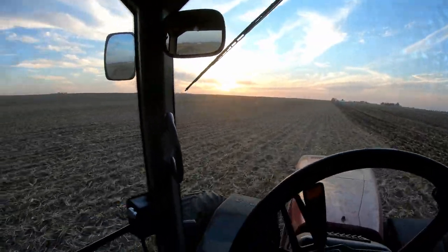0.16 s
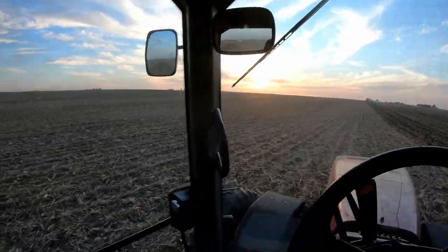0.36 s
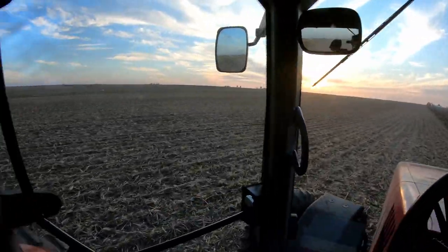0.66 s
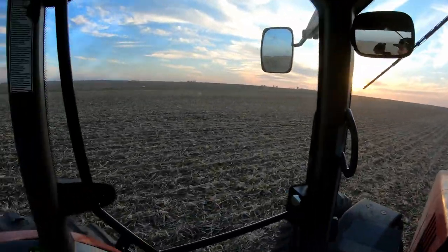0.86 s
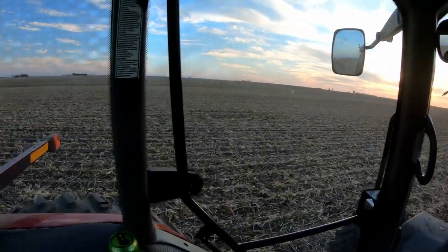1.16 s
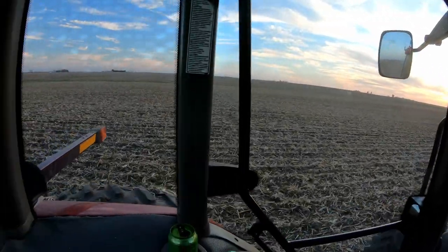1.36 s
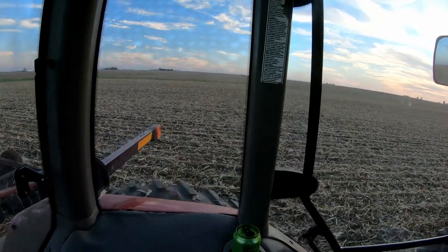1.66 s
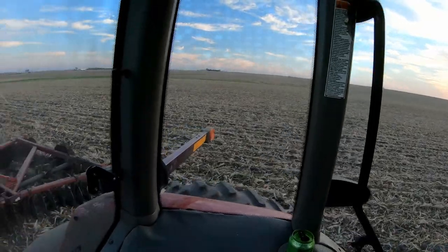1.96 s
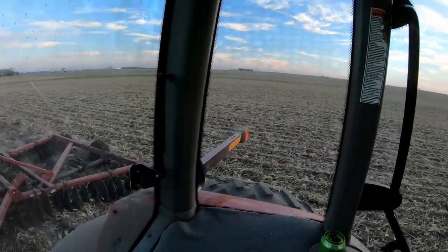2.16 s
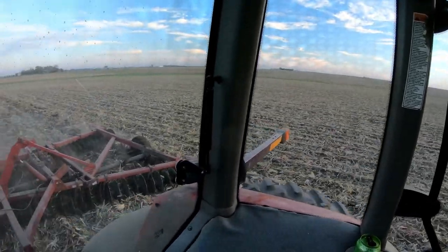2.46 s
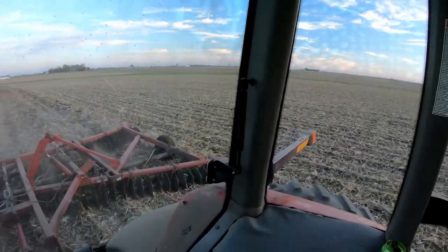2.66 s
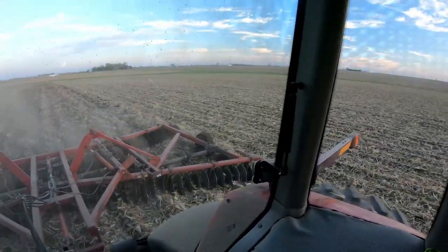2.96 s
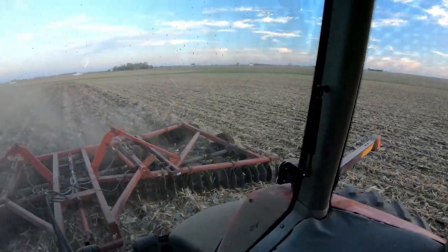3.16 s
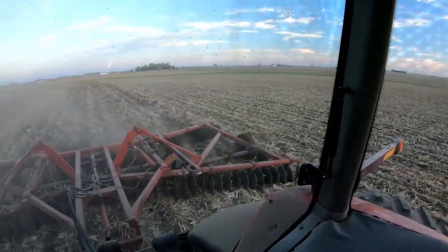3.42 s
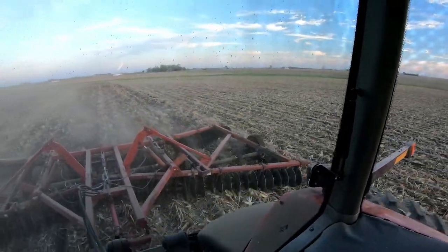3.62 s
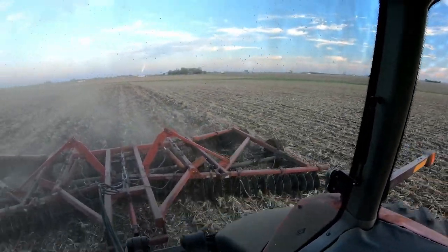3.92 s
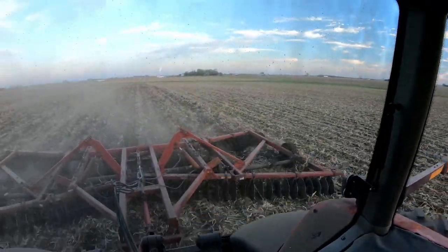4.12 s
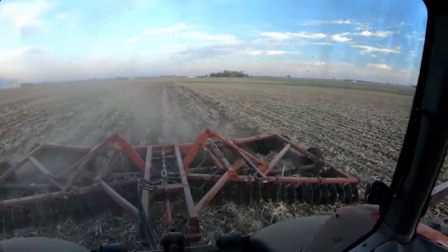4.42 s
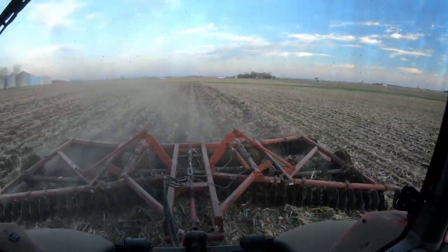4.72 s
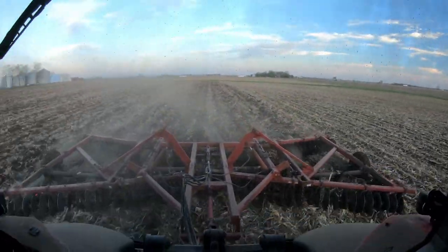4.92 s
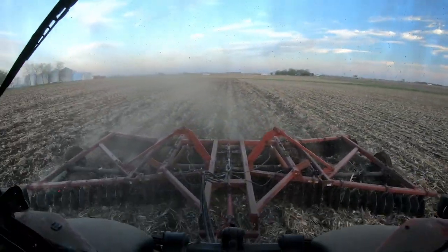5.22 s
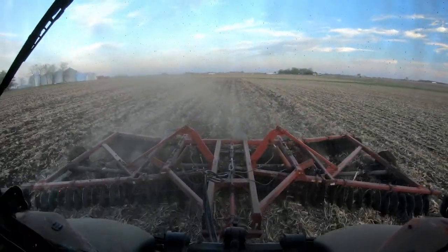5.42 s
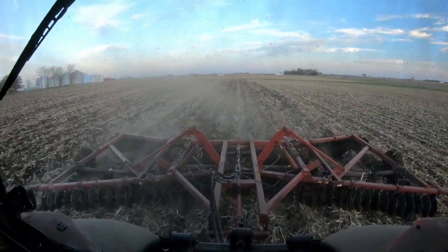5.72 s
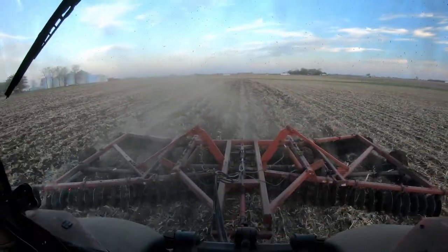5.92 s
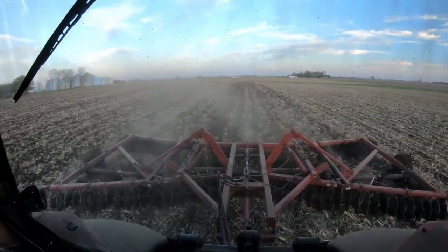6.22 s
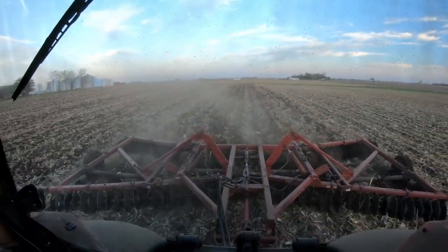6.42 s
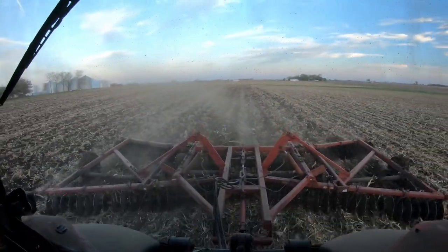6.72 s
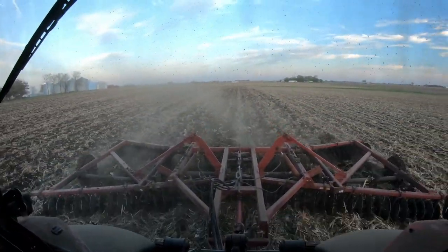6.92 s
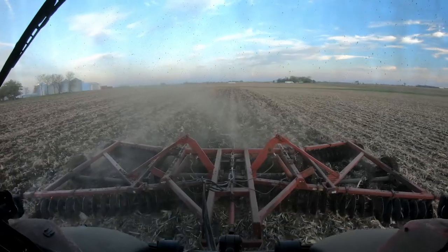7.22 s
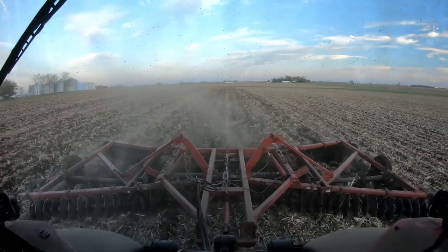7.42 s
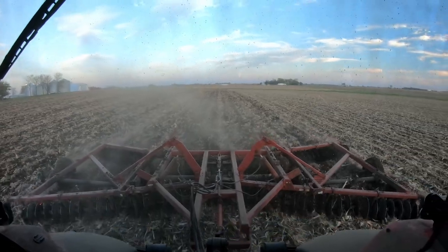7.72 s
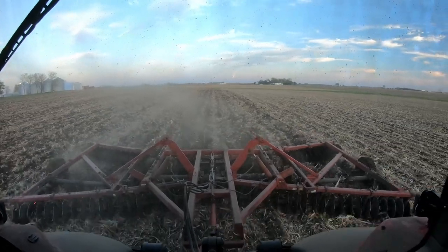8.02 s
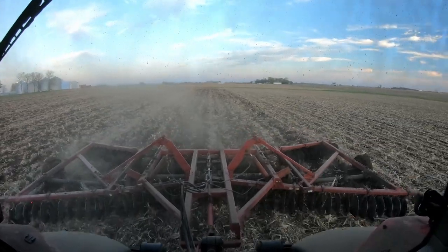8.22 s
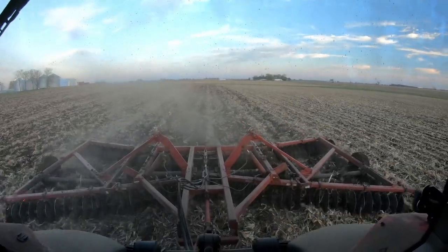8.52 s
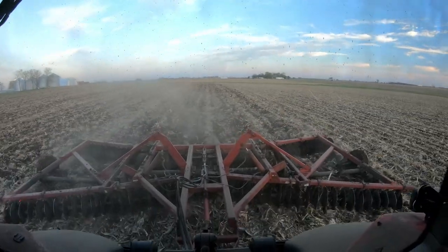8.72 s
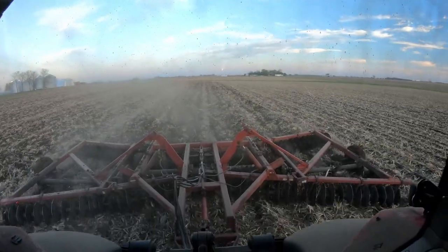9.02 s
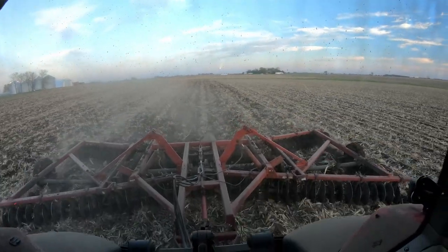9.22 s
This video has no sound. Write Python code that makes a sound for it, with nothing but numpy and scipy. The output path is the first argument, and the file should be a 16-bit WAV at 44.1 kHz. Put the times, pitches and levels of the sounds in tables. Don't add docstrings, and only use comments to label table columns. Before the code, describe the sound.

Inside the closed cab of a diesel tractor pulling a disc harrow across a dry field, mono, dry and close. At 0 s the engine drones at a constant low pitch, around 84 Hz, with grainy clatter and thin gear whine from the bonnet side. From 0.3 to 1.5 s the low boom swells strongly as the listener turns, its octave overtone growing until 2 s, then easing and returning slightly after 6.5 s. The full boom holds to the end at 9.4 s. Deep uneven ground rumble and wall drumming continue throughout, with panels ringing and a faint high turbo whine. A hard short rattling knock falls at 0.65 s, a firm one at 1.6, light ones at 2.8, 3.7 and 4.9, a medium one at 6.5. Fine grit hisses softly on glass, with tiny ticks mostly between 1 and 4 s, and later at 5.9 and 8 s.

```python
import sys
import numpy as np
from scipy import signal
from scipy.fft import rfft, irfft, next_fast_len
from scipy.io import wavfile

SR = 44100
rng = np.random.default_rng(int(sys.argv[2]) if len(sys.argv) > 2 else 0)


def digitize_waveform(pressure):
    field = np.atleast_2d(pressure).T
    bounded = np.clip(field, -1, 1)
    quanta = np.round(bounded * 32767).astype(np.int16)
    wavfile.write(sys.argv[1], SR, quanta)


def natural_amplitude(level_db):
    exponent = np.asarray(level_db, float) / 20
    return 10 ** exponent


N = 413216


def engine():
    # t/s, boom level/dB, second harmonic level/dB
    firing = [(0.0, -25, -33), (0.35, -23, -32), (0.7, -20.5, -38), (1.05, -16.5, -38), (1.45, -13.5, -27),
              (1.95, -13.5, -23.5), (3.2, -13.3, -25.5), (4.4, -13.5, -30), (5.6, -13.5, -34),
              (6.4, -13.5, -32), (7.5, -13, -29), (9.37, -13, -28.5)]
    # order [sixths of the firing rate], level/dB rms
    uneven = [(8, -39), (9, -44), (10, -44.5), (14, -47.5), (20, -53), (22, -56), (24, -50.5)]
    # f/Hz, level/dB rms
    shafts = [(28, -43), (35, -39), (51.5, -52)]
    firing_hz = 84.05
    octave_lag = 0.8
    boom_db, octave_db = in_time(firing)
    third_db = heard(back_db=-52.5, front_db=3, side_db=-3.5, part="third")

    phase = 2 * np.pi * np.cumsum(firing_hz + 0.087 * drift(1.3)) / SR
    note = natural_amplitude(boom_db + 0.12 * drift(5.6)) * np.cos(phase)
    note += natural_amplitude(octave_db + 0.7 * drift(3.8)) * np.cos(2 * phase - octave_lag)
    note += natural_amplitude(third_db + 2.5 * drift(1.5)) * np.cos(3 * phase)
    for sixths, db in uneven:
        start = 2 * np.pi * rng.random()
        note += natural_amplitude(db + 2.5 * drift(2)) * np.cos(phase * round(sixths) / 6 + start)
    driveline = sum(natural_amplitude(db) * tone(hz, wobble_hz=0.22, flutter_db=2.5) for hz, db in shafts)
    return np.sqrt(2) * note + driveline


def cab():
    # f/Hz, level/dB per Hz
    rumble_colour = [(2, -14), (5, 0), (9, -7), (15, -3), (24, -10), (36, -16), (45, -25), (60, -29),
                     (72, -24), (80, -30)]
    # f/Hz, level/dB per Hz
    drum_colour = [(66, -37), (76, -17), (84, -19), (92, 2), (102, 1.5), (115, 0.5), (132, -15.5),
                   (155, -7.5), (185, -13.5), (230, -20), (300, -27)]
    # f/Hz, level/dB per Hz
    block_colour = [(120, -32.5), (200, -1.5), (293, -8), (338, -5.5), (361, -7), (480, -4), (520, -9),
                    (660, -10), (908, -14), (1170, -13.5), (1230, -15), (1440, -18), (2560, -20),
                    (4540, -33.5), (9000, -42.5), (11700, -74), (19800, -120)]
    # t/s, level/dB
    ground = [(0, -35), (1.1, -33.5), (1.7, -39), (2.5, -31.5), (3.9, -28.5), (4.6, -32.5), (4.9, -27),
              (7.2, -28.5), (8.1, -31.5), (8.8, -28), (9.07, -32), (9.3, -21.5)]
    white = rng.standard_normal((4, N))

    rumble_db = heard(back_db=-33, front_db=3, side_db=2.5) + 5.0 + 1.5 * drift(1.5)
    rumble = natural_amplitude(rumble_db) * coloured(white[0], rumble_colour)

    drum_db = in_time(ground)[0] + 0.39 * drift(6.1)
    drumming = natural_amplitude(drum_db) * coloured(white[1], drum_colour)

    strokes = white[2] * natural_amplitude(0.21 * drift(4.8) + 0.6 * drift(30))
    block_db = heard(back_db=-42.5, front_db=2, side_db=0.65) + 3.5
    clatter = natural_amplitude(block_db) * coloured(strokes, block_colour)
    return rumble + drumming + clatter + ringing(white[3])


def ringing(white):
    # name, f/Hz, width/Hz, level/dB facing back, extra/dB front, extra/dB side
    panels = [("wall", 297, 62, -43.5, -7, 2), ("window", 480, 34, -46, 0.1, 0.1),
              ("trim", 422, 16, -55, 8.4, 5.6), ("bonnet", 1430, 110, -55.5, 7, 0.1),
              ("hood side", 2480, 140, -59.5, 6.9, 1.7)]
    # f/Hz, width/Hz, level/dB rms
    covers = [(672, 9, -59), (1680, 30, -66), (2625, 12, -70), (3350, 300, -64)]
    out = np.zeros(N)
    for name, hz, width_hz, *facing_db in panels:
        out += natural_amplitude(heard(*facing_db, part=name)) * narrow(white, hz, width_hz)
    for hz, width_hz, db in covers:
        out += natural_amplitude(db + 3.4 * drift(1.3)) * narrow(white, hz, width_hz)
    return out


def gears():
    # name, f/Hz, level/dB facing back, extra/dB front, extra/dB side
    whines = [("mesh 1", 1056, -55.5, 1.3, 0.1), ("mesh 2", 1147, -57.5, 2.6, 3),
              ("mesh 3", 1316, -67, 10, 9.4), ("mesh 4", 2107, -67, 6, 3), ("pump", 1862, -65.5, 3, 0.1),
              ("blower", 4255, -82.5, 6, 1.5), ("idler", 1685, -71, 7, 6), ("window", 487, -47.5, 0.1, 0.1),
              ("cover", 672, -56.5, -7, -5.5)]
    # t/s, f/Hz
    turbo = [(0, 8430), (1.3, 8320), (2.0, 8380), (3.5, 8430), (4.6, 8350), (6.5, 8300), (7.5, 8370),
             (8.6, 8580), (9.37, 8680)]
    out = np.zeros(N)
    for name, hz, *facing_db in whines:
        out += natural_amplitude(heard(*facing_db, part=name)) * tone(hz, wobble_hz=hz * 0.002, flutter_db=2.5)
    blade_hz = in_time(turbo)[0]
    blade_db = heard(back_db=-82.5, front_db=6.6, side_db=3, part="turbo")
    return out + natural_amplitude(blade_db) * tone(blade_hz, wobble_hz=14, flutter_db=3.5)


def knocks():
    # t/s, peak level/dB, ringing f/Hz, dull f/Hz, dull level/dB
    strikes = [
        (.6508, -22, 2400, 1700, 0.5),
        (1.5725, -27.5, 2700, 1550, 0.5),
        (2.7794, -39, 2100, 1430, -4),
        (3.7174, -43, 3050, 1670, -8),
        (4.8583, -39, 2400, 1450, 1.5),
        (6.5140, -30.5, 2950, 1750, -2),
    ]
    edge_db, decay_s, rise_s = -19.5, 0.011, 0.0012
    length = 4000
    out, t = np.zeros(N), np.arange(length) / SR
    bursts = rng.standard_normal((len(strikes), length))
    for (s, db, hz, dull_hz, dull_db), burst in zip(strikes, bursts):
        rattle = np.sign(burst) * np.exp(-t / decay_s) * (1 - np.exp(-t / rise_s))
        body = narrow(rattle, hz, 600)
        body += natural_amplitude(dull_db) * narrow(rattle, dull_hz, 900)
        body += natural_amplitude(dull_db - 4) * narrow(rattle, 950, 500)
        body += natural_amplitude(edge_db) * narrow(rattle, 6000, 4000)
        out[round(s * SR):][:length] += natural_amplitude(db + 3) * body / np.abs(body).max()
    return out


def grit():
    # f/Hz, level/dB per Hz
    grit_colour = [(3500, -17), (6000, 0.5), (7300, -5), (8600, 1.5), (12200, 1), (14000, -4.5),
                   (15500, -6.5), (17000, -8.5)]
    # t/s, peak level/dB
    ticks = [(1.0824, -40.5), (2.0697, -40), (2.257, -39), (2.4433, -37), (2.7394, -43), (2.9612, -44),
             (3.3894, -46), (3.6282, -53), (4.21, -49), (5.8556, -43), (7.9794, -38.5)]
    gusts_db = 0.7 * drift(12) + 0.8 * drift(40)
    grains = rng.standard_normal(N) * natural_amplitude(1.5 * rng.exponential(1, N) + gusts_db)
    hiss_db = heard(back_db=-63, front_db=-5.5, side_db=-1, part="grit") + 1.5 + 0.6 * drift(1.5)

    length = 880
    decay = np.exp(-np.arange(length) / SR / 0.003)
    stones = np.zeros(N)
    for (s, db), burst in zip(ticks, rng.standard_normal((len(ticks), length))):
        stones[round(s * SR):][:length] += natural_amplitude(db - 6.0) * burst * decay
    glass = signal.butter(3, [8000, 13500], "band", fs=SR, output="sos")
    return natural_amplitude(hiss_db) * coloured(grains, grit_colour) + signal.sosfilt(glass, stones)


def heard(back_db, front_db, side_db, part=""):
    # t/s, angle/degrees
    facing = [
        (0, 0),
        (0.6, 19),
        (1.5, 64.5),
        (2.5, 98),
        (3.7, 135.5),
        (4.75, 179.5),
        (9.37, 179.5),
    ]
    # part, middle t/s, length/s, level/dB
    swells = [("window", 0.02, 0.44, 5.5), ("window", 0.9, 0.73, 4.5), ("window", 1.86, 0.78, 3.4),
              ("window", 3.1, 1.8, -7), ("window", 4.43, 0.71, 5.1), ("window", 4.5, 0.27, -12),
              ("window", 5.4, 0.54, 2.6), ("window", 6.75, .7, 3), ("window", 8.25, 0.65, 2.8),
              ("window", 8.75, 0.27, 5.5), ("trim", 2.22, 0.45, 8.3), ("trim", 8.9, .5, 12),
              ("wall", 1.18, 0.57, 6.7), ("turbo", 7.4, 3.5, 4), ("wall", 3.6, 0.71, 3),
              ("wall", 8.6, .8, 3.6), ("bonnet", 1.75, 0.65, 4.5), ("bonnet", 5.7, 3.5, 5.3),
              ("bonnet", 8.4, 0.54, 5), ("mesh 1", 0.39, 0.35, 5), ("grit", 2.96, 3.5, 3.2),
              ("mesh 1", 2.45, 1, -8), ("third", 0.15, .9, 8), ("mesh 2", 3.2, 1.5, 7),
              ("mesh 2", 7.35, 1.3, 5.5), ("hood side", 0.77, 0.59, 5), ("mesh 3", 2.2, 1.3, 6.7),
              ("mesh 4", 8.66, 1.6, 10.6), ("blower", 5.7, 2.6, 11), ("pump", 7.8, 3.5, 7)]
    t = np.arange(0, N + 64, 64) / SR
    angle = np.radians(np.interp(t, *np.transpose(facing)))
    db = back_db + front_db * np.maximum(np.cos(angle), 0) ** 2 + side_db * np.sin(angle) ** 2
    for name, s, length, swell_db in swells:
        if name == part:
            db += swell_db * np.cos(np.pi * np.clip((t - s) / length, -0.5, 0.5)) ** 2
    return np.interp(np.arange(N) / SR, t, db)


def tone(hz, wobble_hz, flutter_db):
    phase = 2 * np.pi * (np.cumsum(hz + wobble_hz * drift(2.97)) / SR + rng.random())
    return np.sqrt(2) * np.sin(phase) * natural_amplitude(flutter_db * drift(6.1))


def narrow(white, hz, width_hz):
    once = resonance(white, hz, width_hz)
    return rms_one(resonance(once, hz, width_hz))


def resonance(x, hz, width_hz):
    r = np.exp(-np.pi * width_hz / SR)
    poles = [1, -2 * r * np.cos(2 * np.pi * hz / SR), r * r]
    return signal.lfilter([(1 - r * r) / 2, 0, (r * r - 1) / 2], poles, x)


def coloured(x, spectrum):
    size = next_fast_len(N)
    hz = np.arange(1, size // 2 + 2) * SR / size
    points_hz, points_db = np.transpose(spectrum)
    gain = natural_amplitude(np.interp(np.log(hz), np.log(points_hz), points_db, left=-90, right=-90))
    return rms_one(irfft(rfft(x, size) * gain, size)[:N])


def drift(rate):
    r = np.exp(-80 * np.pi * rate / SR)
    white = rng.standard_normal(N // 40 + 4002)
    slow = signal.lfilter([1], [1, -2 * r, r * r], white)[4000:]
    return np.interp(np.arange(N) / 40, np.arange(len(slow)), rms_one(slow - slow.mean()))


def rms_one(x):
    return x / np.sqrt(np.mean(x ** 2) + 1e-20)


def in_time(rows):
    s, *columns = np.transpose(rows)
    return [np.interp(np.arange(N) / SR, s, c) for c in columns]


def scene():
    return (engine() + cab() + gears() + knocks() + grit())[None]


def band_limit(x):
    return signal.sosfilt(signal.butter(12, 15620, fs=SR, output="sos"), x)


def record(dry):
    return band_limit(dry)


dry = scene()
out = record(dry)
digitize_waveform(out)
```